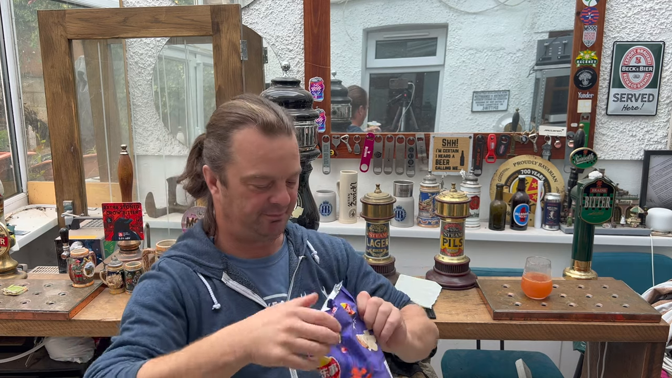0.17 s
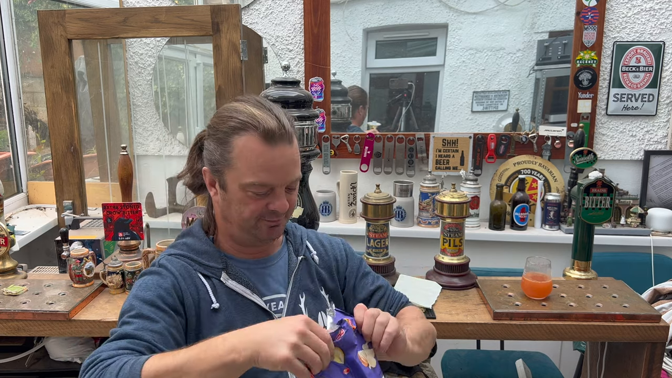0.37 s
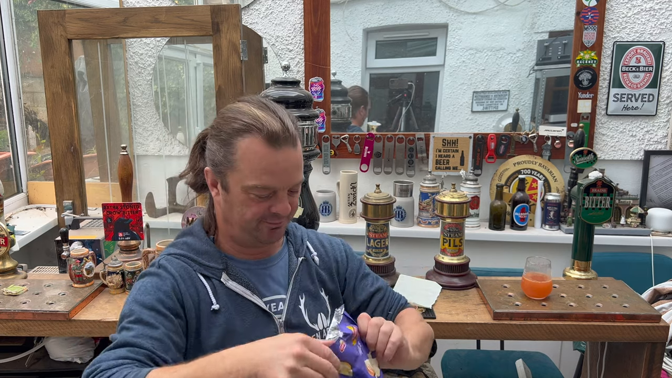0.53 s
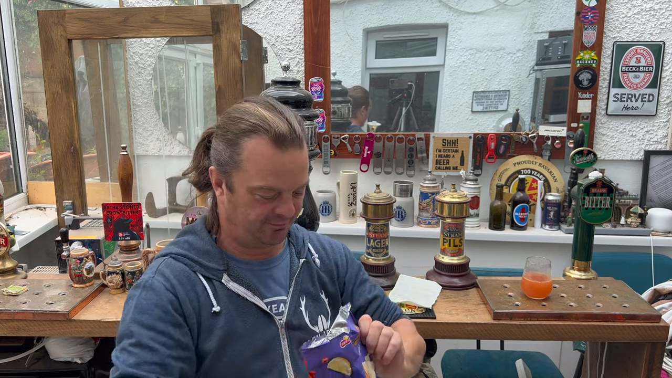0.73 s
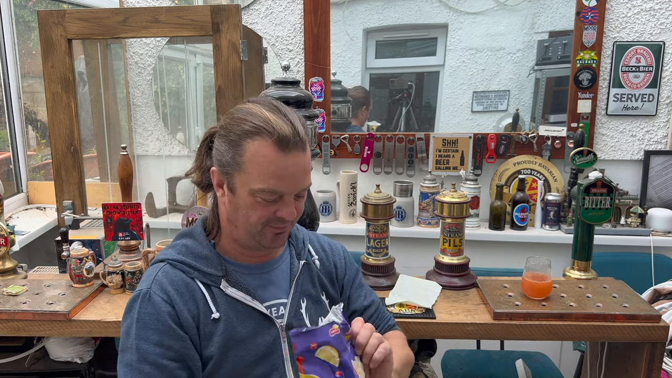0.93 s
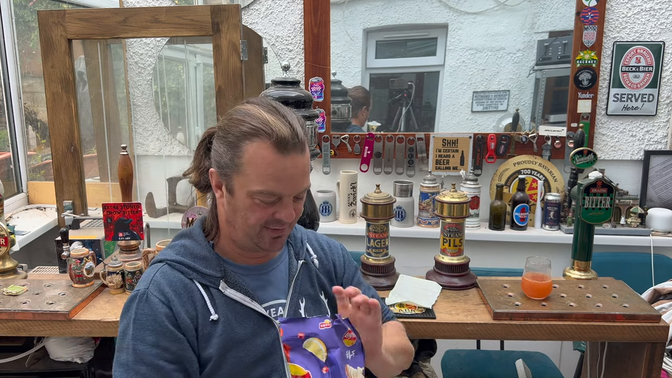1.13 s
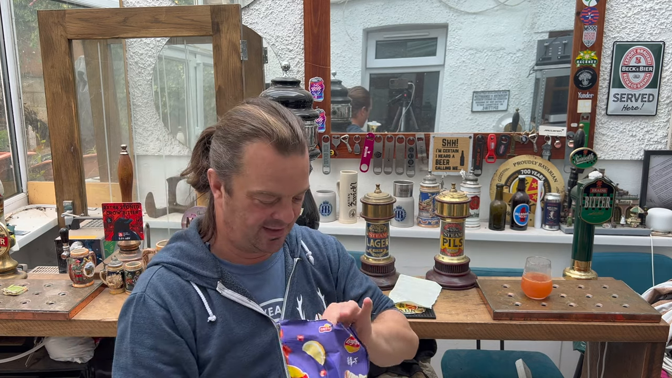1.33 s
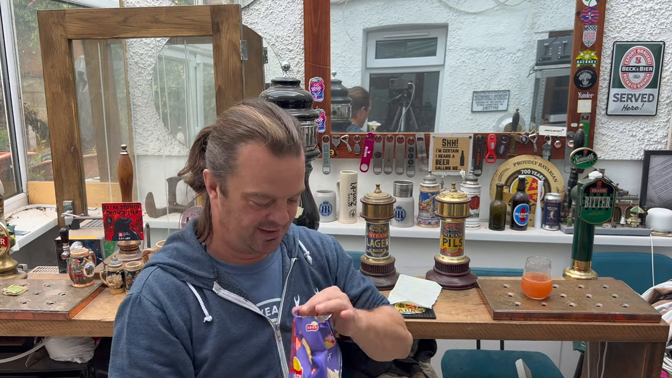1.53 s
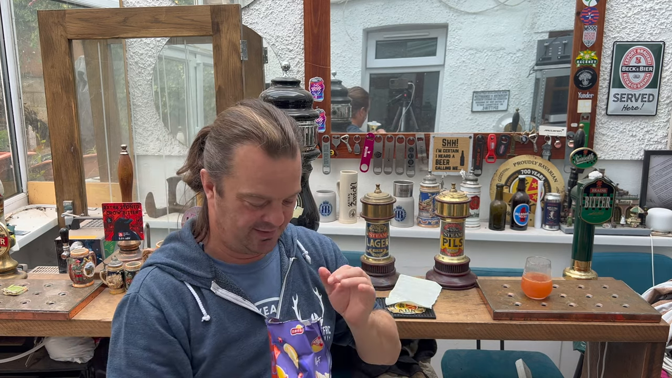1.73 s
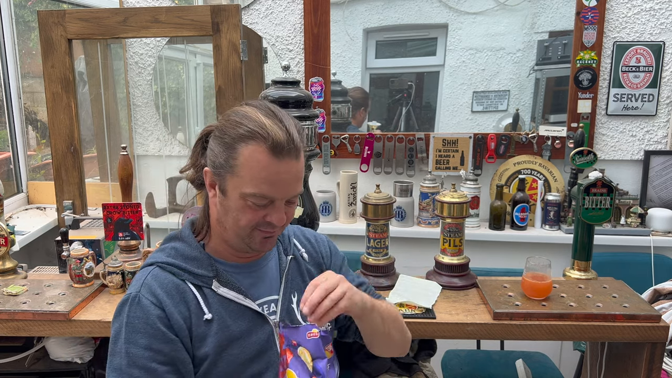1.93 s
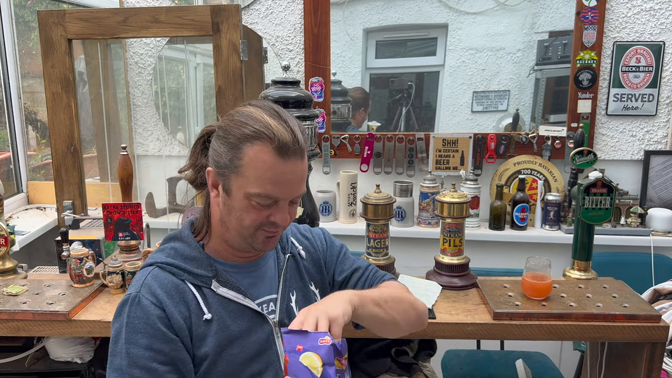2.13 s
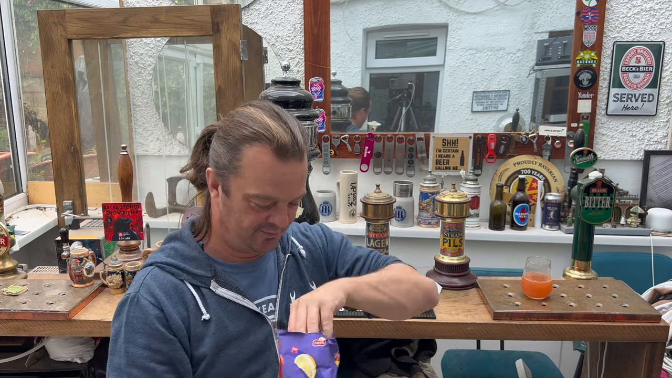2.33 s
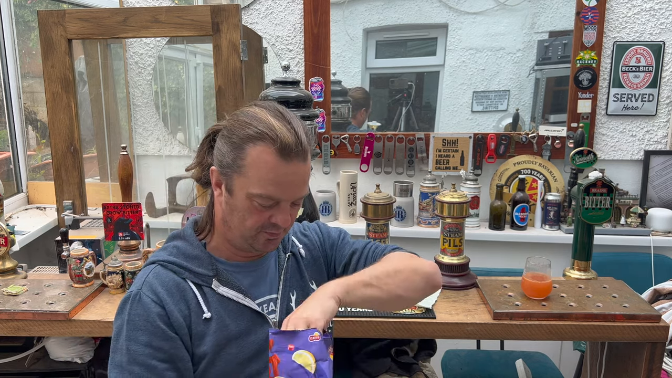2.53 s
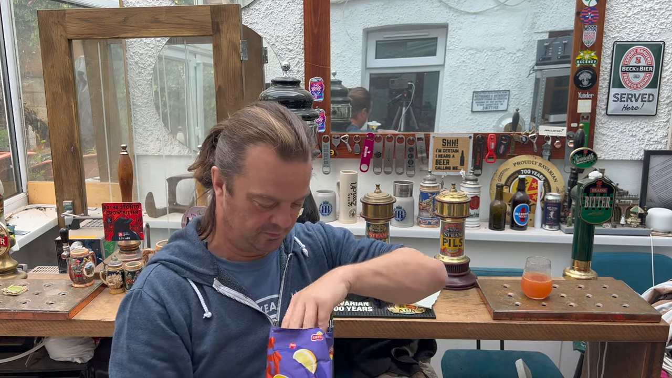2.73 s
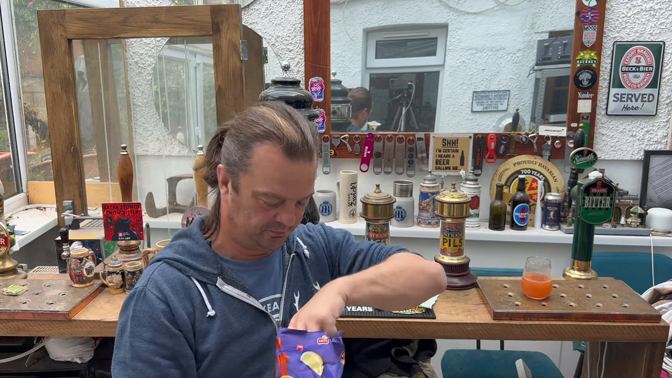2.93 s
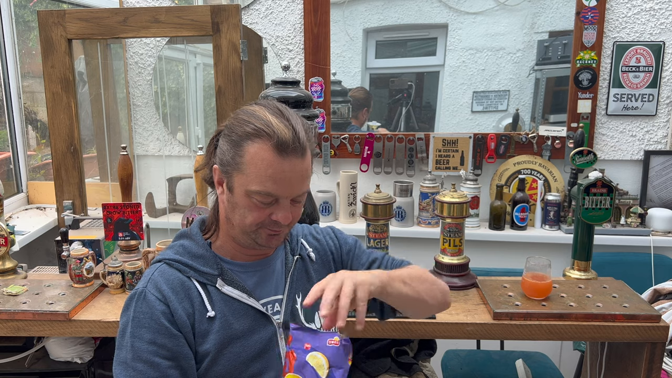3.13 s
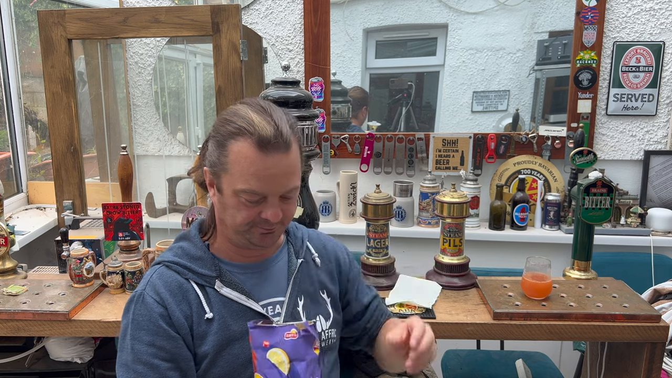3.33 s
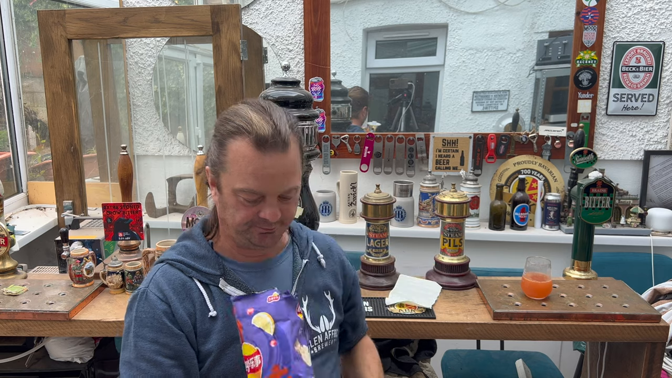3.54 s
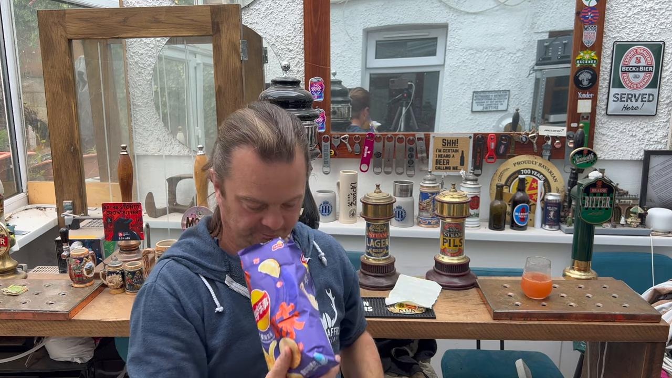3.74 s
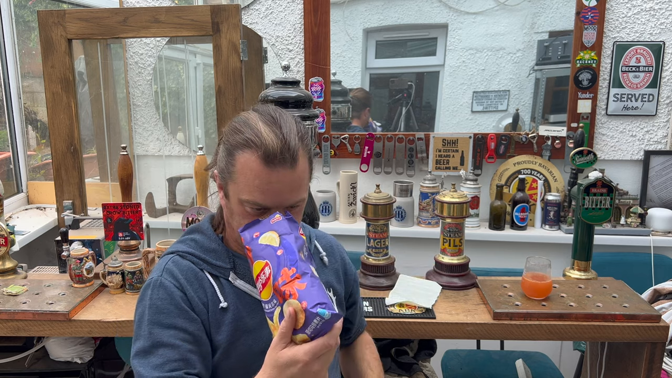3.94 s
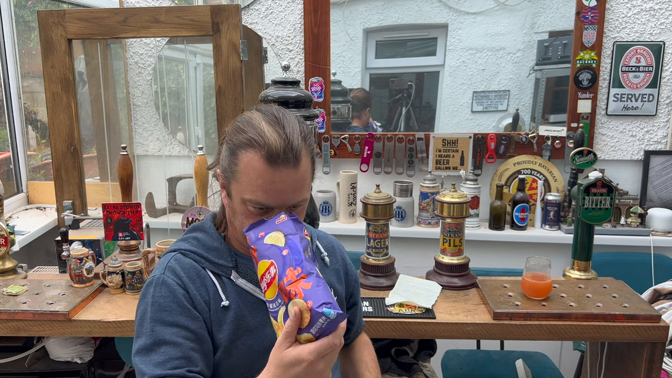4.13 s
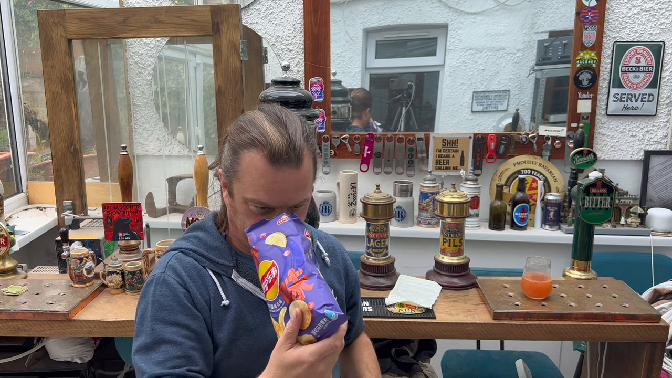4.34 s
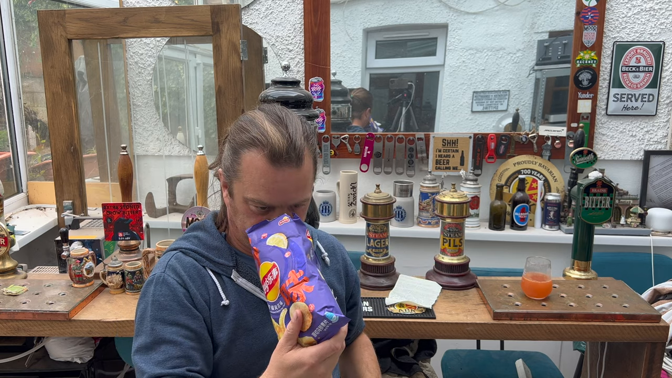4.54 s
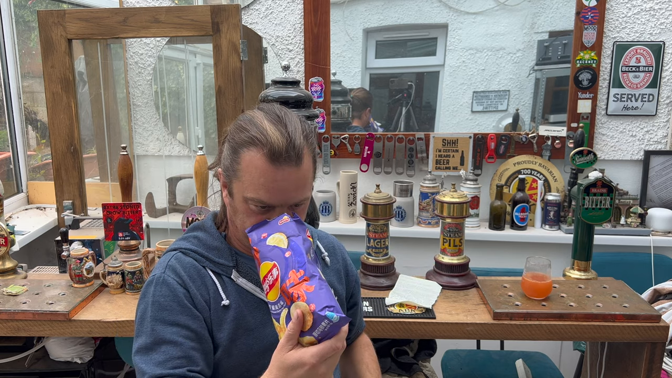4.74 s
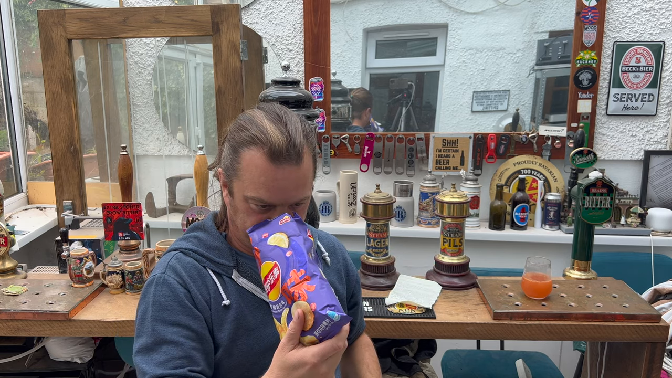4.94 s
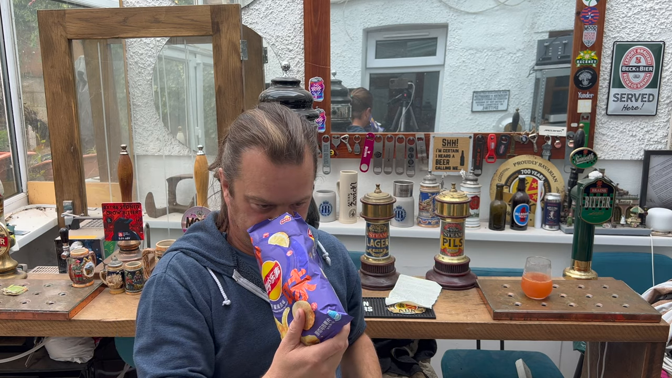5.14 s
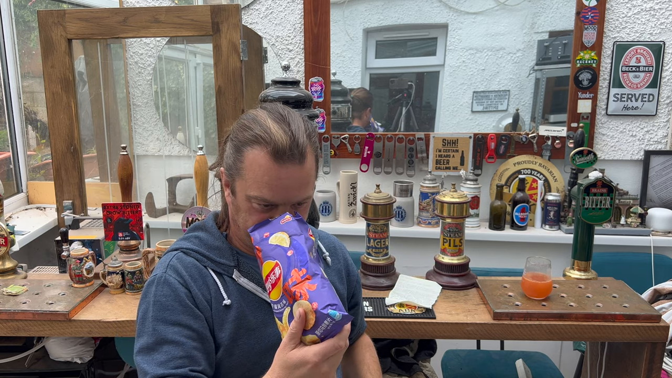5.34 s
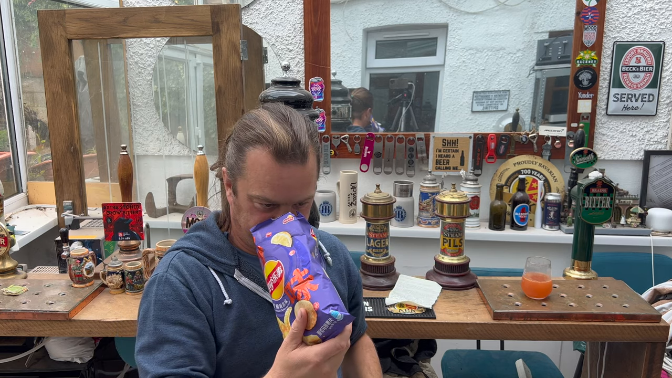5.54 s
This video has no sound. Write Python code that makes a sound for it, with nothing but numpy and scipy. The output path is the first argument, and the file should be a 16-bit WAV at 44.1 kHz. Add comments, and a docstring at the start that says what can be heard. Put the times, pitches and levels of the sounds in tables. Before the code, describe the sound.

Close stereo recording in a small, hard-walled room: a foil snack bag is opened and rummaged in. Bright snaps, hollow panel pops and fine crinkles come in irregular bursts, loudest near 1.4 and 2.1 seconds, with short live reflections. Handling thins after 3.3 seconds, leaving low air noise and wavering appliance hum, then a few faint dull bumps and ticks after 5 seconds.

```python
"""A small hard-walled room: a foil snack bag is pulled open and rummaged in.
Creases snap with a bright crack while the panels around them pop, each snap an avalanche of tiny buckles;
panels also swing with a short pitched "wip". Between the snaps, gripping fingers crinkle the small folds
and push the air in the bag, and the hand bumps its soft side. Dense reflections and narrow resonances
ring on behind, over low air noise and the wavering hum of an appliance."""
import sys
import numpy as np
from scipy import signal
from scipy.fft import rfft, irfft
from scipy.io import wavfile
from scipy.ndimage import uniform_filter1d

SR = 44100
rng = np.random.default_rng(int(sys.argv[2]) if len(sys.argv) > 2 else 0)


def wrap_up_sound(samples):
    """Save the sound to the file named by the first command line argument, as 16-bit audio."""
    columns = np.atleast_2d(samples).T
    # keep every value between -1 and 1, then stretch to whole-number steps
    tamed = np.clip(columns, -1, 1)
    steps = np.round(tamed * 32767).astype(np.int16)
    wavfile.write(sys.argv[1], SR, steps)


N = 250488

PANEL_HZ, PANEL_SPREAD = 1155, 0.3  # usual pitch of a flexing panel; how pitches differ (natural log)
# half widths of the resonances: foil rings for a few milliseconds only
PANEL_WIDTH_HZ, CREASE_WIDTH_HZ = 140, 220


def amp(db):
    """Decibels to gain."""
    return 10 ** (np.asarray(db) / 20)


def unit(x):
    """Scales to energy 1."""
    return x / np.sqrt(np.sum(x ** 2, axis=-1, keepdims=True) + 1e-20)


def read(points, hz):
    """A table's value at hz, on a log-frequency axis."""
    f, value = np.transpose(points)
    return np.interp(np.log(hz + 1), np.log(f + 1), value)


def envelope(points):
    """A (t/s, value) table drawn as straight lines over the whole scene."""
    return np.interp(np.arange(N) / SR, *np.transpose(points))


def add(mix, s, sound):
    """Mixes a sound in at time s."""
    at = round(s * SR)
    sound = sound[max(-at, 0):]
    part = mix[max(at, 0):][:len(sound)]
    part += sound[:len(part)]


def drift(count):
    """Smooth chance of rms 1 that changes over about count samples."""
    slow = rng.standard_normal(N)
    for _ in range(2):
        slow = uniform_filter1d(slow, count, mode="wrap")
    return slow / slow.std()


def steady(x, size):
    """Holds a random texture near rms 1 over stretches of size samples."""
    return x / np.sqrt(abs(uniform_filter1d(x ** 2, size)) + 1e-9)


def click(spectrum, stretch=1, tilt_db=0, ring=(1000, 100, 0), size=1024):
    """The shortest causal (minimum-phase) click with a given spectrum.

    stretch moves it up in frequency, tilt_db (per octave) brightens the treble,
    ring is a resonance (f/Hz, half width/Hz, level/dB)."""
    hz = abs(np.fft.fftfreq(size, 1 / SR))
    octaves = np.log2(np.maximum(hz, 2500))  # the tilt starts at 2500 Hz
    tilt = tilt_db * (octaves - octaves[0])
    ring_hz, width_hz, ring_db = ring
    peak = (amp(ring_db) ** 2 - 1) / (1 + ((hz - ring_hz) / width_hz) ** 2)
    gain = np.sqrt(1 + peak) * amp(read(spectrum, hz / stretch) + tilt)
    minimum_phase = np.exp(np.conj(signal.hilbert(np.log(gain))))
    return unit(np.fft.ifft(minimum_phase).real[:size // 2])


# How alike diffuse sound is at the microphone's two ports: (f/Hz, coherence)
LIKENESS = [(60, 0.99), (130, 0.79), (250, 0.87), (500, 0.061), (1000, 0), (2000, 0), (4000, 0)]


def pair(z, hz):
    """Makes two unrelated spectra as alike as diffuse sound is at the two ports."""
    same = read(LIKENESS, hz)
    return np.array([z[0], same * z[0] + np.sqrt(1 - same ** 2) * z[1]])


# Colour of the air noise: (f/Hz, relative level/dB per Hz)
FLOOR = [(25, -13), (45, -11.5), (70, -7.5), (110, -5.5), (135, -6), (200, -8.5), (330, -11), (400, -8),
         (520, -13.5), (650, -22.5), (800, -19), (1100, -19.5), (1350, -22.5), (1600, -22), (2000, -30.5),
         (2800, -40), (5500, -44), (7300, -38.5), (10000, -57.5), (16000, -76)]
FLOOR_DB = -58


def air_noise():
    """Low air noise: random sound from everywhere, shaped in frequency."""
    hz = np.fft.rfftfreq(N, 1 / SR)
    spectra = pair(rfft(rng.standard_normal((2, N))), hz)
    air = irfft(spectra * amp(read(FLOOR, hz)), N)
    return amp(FLOOR_DB) * np.sqrt(N) * unit(air)


# Lines of the appliance hum: (centre f/Hz, rms level/dB before its waver)
HUM = [(69, -79.5), (105.7, -62.5), (185, -70), (212, -70.5), (258, -77), (371.5, -68)]


def appliance_hum(waver_hz=4.0, waver_db=3.0):
    """Low sine lines whose pitch and level each waver smoothly."""
    hum = np.zeros(N)
    for line_hz, db in HUM:
        turns = np.cumsum(line_hz + waver_hz * drift(count=3000)) / SR
        level = amp(db + waver_db * drift(count=3000))
        hum += np.sqrt(2) * level * np.sin(2 * np.pi * turns)
    return hum


def facet(spectrum, spread, patchy_db, ring):
    """The click of one small patch of foil: its size shifts the spectrum, its shape favours some bands."""
    hz = np.geomspace(200, 16000, 24)
    favour_db = patchy_db * rng.standard_normal(len(hz))
    own = np.column_stack([hz, read(spectrum, hz) + favour_db])
    return click(own, np.exp(spread * rng.standard_normal()), ring=ring)


# Colour of a snapping crease: (f/Hz, relative level/dB per Hz)
CREASE = [(300, -19.5), (900, -11.5), (1900, -4), (2700, -1), (3600, -3), (5200, 2), (6800, 1),
          (8700, -1.5), (11500, -16.5), (15500, -21)]


def crease(ring_db=9):
    """A sharp fold flips over and rings briefly at a pitch of its own."""
    hz = 4500 * 2 ** rng.uniform(-1.1, .8)
    return facet(CREASE, spread=.04, patchy_db=3.5, ring=(hz, CREASE_WIDTH_HZ, ring_db))


# Colour of a buckling panel: (f/Hz, relative level/dB per Hz)
PANEL = [(200, -18.5), (480, -9), (780, -1.5), (1080, 3), (1320, -4), (1800, 0.5), (2400, -10), (5000, -27),
         (16000, -54)]


def panel(ring_db=12):
    """A wide face of the bag buckles and swings for a few cycles at its own pitch."""
    hz = PANEL_HZ * np.exp(PANEL_SPREAD * rng.standard_normal())
    return facet(PANEL, spread=.15, patchy_db=4.5, ring=(hz, PANEL_WIDTH_HZ, ring_db))


def folds(make_facet, per_s, count=24):
    """A clumped stream of small buckles of all sizes; the stress hops from one patch of foil to the next."""
    size = amp(3.5 * np.minimum(rng.exponential(1, N), 4) + 5 * drift(count=70))
    hits = size * rng.choice([-1, 1], N) * (rng.random(N) < per_s / SR)
    hops = np.cumsum(rng.random(N) < 300 / SR)  # 300 hops a second on average
    patch = rng.integers(0, count, N)[hops]
    stream = sum(signal.oaconvolve(hits * (patch == k), make_facet())[:N] for k in range(count))
    return steady(stream, size=1100)


# Colour of the air pushed by the bag: (f/Hz, relative level/dB per Hz)
AIR = [(25, -32), (45, -11.5), (65, 5), (90, 4), (160, 5), (280, -6.5), (400, -9.5), (600, -20),
       (1500, -40.5)]


def pushed_air():
    """The bag pushes air: a low rumble of noise at an even level."""
    rumble = signal.oaconvolve(rng.standard_normal(N), click(AIR, size=8192))[:N]
    return steady(rumble, size=1500)


# Short grips of the fingers: (start t/s, length t/s, force: relative level/dB,
# crispness: level/dB more for the fine folds and less for the panels, pushed air: level/dB)
GRIPS = [(-0.01, 0.093, -46, -0.5, -52), (0.163, 0.11, -48, 0, -52.5), (0.296, 0.051, -47.5, 6, -51.5),
         (0.376, 0.039, -34.5, 2, -42), (0.857, 0.11, -44.5, 3.5, -49.5), (0.999, 0.14, -46.5, -3, -60.5),
         (1.253, 0.11, -49.5, 1.5, -57), (1.359, 0.067, -29.5, 1.5, -40), (1.499, 0.072, -45.5, 1.5, -49.5),
         (1.74, 0.81, -66.5, -3, -70), (2.007, 0.08, -46, -4, -50.5), (2.08, 0.079, -30.5, -1.5, -39),
         (2.16, 0.092, -39.5, -0.5, -47.5), (2.471, 0.18, -40.5, -1, -47), (2.848, 0.12, -56.5, -1, -59),
         (2.877, 0.025, -36.5, 0, -48), (2.917, 0.24, -47, -2.5, -50.5), (3.215, 0.16, -56, -1.5, -60),
         (3.75, 0.11, -75.5, -2, -72.5)]
GRIP_ATTACK_S, GRIP_RELEASE_S, RELAX_DB_PER_S = 0.0065, 0.0063, 23
AIR_ATTACK_S = 0.0062  # rise of the pushed air


def grips():
    """Each grip takes hold, relaxes and lets go. Gives the drive of (fine folds, panels, pushed air)."""
    out = np.zeros((3, N))
    t = np.arange(SR) / SR
    for s, length_s, force_db, crisp_db, air_db in GRIPS:
        hold = amp(-RELAX_DB_PER_S * t) * np.exp(-np.maximum(t - length_s, 0) / GRIP_RELEASE_S)
        foil = hold * np.minimum(t / GRIP_ATTACK_S, 1)
        air = hold * np.minimum(t / AIR_ATTACK_S, 1)
        add(out[0], s, amp(force_db + crisp_db) * foil)
        add(out[1], s, amp(force_db - crisp_db) * foil)
        add(out[2], s, amp(air_db) * air)
    return out


# Taut foil sparkles more than slack foil: (t/s, treble level/dB of the fine folds)
TAUTNESS = [(0, -15), (.3, 12), (.9, 7), (1.4, 5), (2.1, 6.5), (2.6, 0), (3.0, 3), (3.3, -22), (5.3, -7)]


def crinkle(flex_db=-6.0, top_hz=8500, flex_aim=0.91, detour=13):
    """The fingers keep small folds snapping and panels flexing, and the bag pushes air.

    Gives (left, right, into the room)."""
    fine, flex, air = grips()
    creases = fine * folds(crease, per_s=2200)
    panels = amp(flex_db) * flex * folds(panel, per_s=450)
    treble = signal.butter(2, top_hz, "high", fs=SR, output="sos")
    top = signal.sosfiltfilt(treble, creases)
    body = creases - top + air * pushed_air()
    sparkle = top * amp(envelope(TAUTNESS))
    direct = body + flex_aim * panels
    # the shortest waves reach the left port by a detour (in samples)
    late_sparkle = np.pad(sparkle, (detour, 0))[:N]
    return np.array([direct + late_sparkle, direct + sparkle, body + panels + sparkle])


# The clearest snaps of the foil: (t/s, crease crack level/dB, panel pop level/dB,
# aim: extra direct level/dB towards the microphone, fall time of the avalanche t/s,
# panel pitch f/Hz, crease pitch f/Hz, how far the crease's pitch stands out
# (or, below 0, is cancelled) level/dB, brightness of the crack dB per octave)
SNAPS = [(0.004, -28.5, -36, -1.5, 0.0055, 1830, 5600, 7, 2),
         (0.035, -33, -30, 1.5, 0.002, 1800, 6330.0, 7, -1),
         (0.046, -31, -32.5, 1.5, 0.0032, 1150, 6370.0, 8, -1),
         (0.103, -28.5, -36.5, 1.5, 0.003, 1740.0, 5600, 14, 1),
         (0.164, -30, -24.5, -2, 0.0034, 1060, 5570, 1, -4),
         (0.22, -29.5, -30, 0, 0.0043, 1180, 4800.0, 1, -5),
         (0.233, -26, -44.5, 2.5, 0.0021, 1850.0, 4790.0, 8, -6),
         (0.27, -39, -35, 5.5, 0.0037, 1080, 3640.0, 13, 3),
         (0.295, -22.5, -27, -1.5, 0.0031, 1170.0, 5650, 5, -3),
         (0.307, -27, -29, 3, 0.0016, 1180, 5720.0, 11, 0),
         (0.338, -23.5, -35, 7.5, 0.0014, 1810.0, 5700, 8.5, -2.5),
         (0.372, -15.5, -24.5, 7.5, 0.0028, 1250, 7430, 5.5, 0),
         (0.389, -27.5, -28.5, 10.5, 0.0045, 1420, 5400.0, 4, -5),
         (0.399, -25.5, -40, 8, 0.0024, 1060, 4275, 14, 4),
         (0.496, -31.5, -30, -1.5, 0.011, 1120.0, 7360.0, -7, 7),
         (0.606, -26.5, -31.5, 0, 0.0027, 645, 5160, 3, -0.5),
         (0.719, -34.5, -44, 0, 0.0014, 1570, 6440, 11, 0),
         (0.843, -28.5, -23.5, -7.5, 0.014, 1130, 6130.0, 11, -8),
         (0.878, -34, -27.5, 2.5, 0.0019, 1160.0, 7010.0, 2, 10),
         (0.897, -25, -28, 3.5, 0.0022, 1880, 7600, -5, -2.5),
         (0.946, -23.5, -26, 2, 0.0062, 1850, 2210.0, 10.5, -0.5),
         (0.969, -32, -31, -3, 0.0028, 1700.0, 3570.0, 5, 8),
         (1.008, -48, -34, 7, 0.0014, 1170, 4190.0, 6, -2),
         (1.023, -35.5, -31, 6, 0.0025, 1010, 3650.0, 12, 2.5),
         (1.039, -49, -38.5, -3, 0.0013, 1210, 2210.0, 7, -6),
         (1.082, -21, -28.5, 6, 0.0014, 1020, 6360, 7, 3),
         (1.244, -24.0, -36.5, 0.5, 0.0016, 1610, 5700, 7, -4),
         (1.285, -38.5, -35, 5.5, 0.0012, 1040, 6720.0, 15, 1),
         (1.326, -23, -22, -4, 0.0025, 1800, 3420, 1, -6),
         (1.357, -13.5, -20, -1.5, 0.0024, 1170, 6300, 6, 5),
         (1.364, -15.5, -12.5, -3, 0.0062, 1680, 2600, 14, 6),
         (1.384, -11.5, -18, -2, 0.009, 795, 6560, 10, 1),
         (1.399, -21, -21, 9, 0.0049, 1240, 6630.0, -3, -1.5),
         (1.523, -33.5, -26, 2, 0.0026, 925, 5480.0, 17, 0),
         (1.542, -37, -31.5, 3.5, 0.002, 955, 4490.0, 16, 1),
         (1.561, -51, -37, 6, 0.0015, 1120, 7490.0, 7.5, 4),
         (1.738, -35, -33.5, 3.5, 0.0012, 1000, 5800, 4, -4),
         (1.855, -66, -44.5, 4.5, 0.0029, 714, 2220, 17, -8),
         (1.986, -34.5, -41, 0, 0.005, 1190, 5800, 12, -1.5),
         (2.014, -34.5, -45, 0.5, 0.0016, 1210.0, 4930.0, 13, -1),
         (2.062, -19.5, -20.5, -1, 0.0039, 1150, 4870, 7, 8.5),
         (2.073, -20.5, -24.5, 0.5, 0.0032, 1180, 3130, 14, 0),
         (2.088, -18.5, -23.5, 5, 0.005, 1090, 6470.0, 1, 1),
         (2.118, -24, -26, 6.5, 0.003, 1140, 4850, 11, -3),
         (2.127, -14, -15.5, 2, 0.007, 1170, 5000, 11, 1),
         (2.153, -31, -24.5, 6, 0.003, 1770, 5500, 9.5, -2),
         (2.196, -25.5, -28, 7.5, 0.0027, 1160.0, 7120.0, -8, -3.5),
         (2.25, -46.0, -31.5, 7, 0.0022, 1070, 5760.0, 8, -7),
         (2.448, -38.0, -33, 1, 0.01, 1120.0, 3830, 12, -2),
         (2.47, -26, -27.5, -0.5, 0.0081, 1130, 4890.0, 7, -4.5),
         (2.482, -35, -26.5, -0.5, 0.0012, 1150.0, 4910.0, 3.5, -1),
         (2.546, -27, -27.5, -2.5, 0.003, 1240, 5880.0, 12, 3),
         (2.604, -35, -39, 5, 0.0026, 1100, 4070.0, 9, 2),
         (2.636, -30, -30.5, 0, 0.003, 1040.0, 4730, 5.5, 3),
         (2.652, -28.5, -39, -0.5, 0.0017, 1190, 4570.0, 4, 1),
         (2.691, -41, -33.5, -0.5, 0.0015, 1150, 5680.0, 8, -10),
         (2.813, -46.5, -40, 5, 0.0017, 990, 2390.0, 15.5, -9),
         (2.876, -22, -22.5, -0.5, 0.0054, 1190, 3970, 6, -3.5),
         (2.885, -33, -25.5, 1, 0.0012, 990, 5000, 4.5, -2.5),
         (2.897, -35, -32.5, 8, 0.003, 1110, 5860.0, 10, -5),
         (2.962, -20, -24, 3.5, 0.004, 1150, 5900, 8.5, 0),
         (3.032, -32.5, -31, -3, 0.0018, 1160, 5820.0, 6, 4),
         (3.045, -31.5, -52, -0.5, 0.0022, 1210.0, 6100.0, 5, 2),
         (3.072, -26, -31.5, 2.5, 0.0024, 1020, 5030, 10.5, -6),
         (3.14, -45, -36.5, 3, 0.0018, 1020, 5080.0, 1.6667, -1),
         (3.226, -45, -34.5, -4, 0.002, 1020.0, 7280.0, 5.5, -8),
         (3.253, -39.5, -35, 6, 0.0059, 790, 3120, 4.5, -12),
         (3.313, -49, -43.5, 7.5, 0.002, 1010, 3900.0, 6, -10),
         (3.36, -48.5, -51, 7, 0.0026, 1210, 2920.0, 5.5, -12),
         (3.472, -36, -39.5, -2, 0.0014, 1060, 3400, 9.5, -6),
         (3.649, -62.5, -42, -3, 0.002, 1395, 2490.0, 9.5, -6),
         (3.695, -63.5, -64.0, 3.5, 0.001, 780.0, 8500, 6.5, 6.5),
         (3.742, -55.5, -58.5, 0, 0.0052, 1079, 2590.0, 9.5, -1.5),
         (5.028, -55, -49, -2.5, 0.0024, 730.0, 3590, 11.5, -9),
         (5.342, -52, -57, -3, 0.0015, 1200, 5500, 3, -5),
         (5.349, -43, -45, -5.5, 0.0026, 850, 3620, 9.5, -7.5)]
PANEL_RING_DB, BUCKLES_PER_S = 9, 6000  # how far a panel's pitch stands out; density of an avalanche


def snaps(rise_share=0.83, lead=0.22, own_share=0.94, settle_share=0.61, settle_s=0.019):
    """Each snap is an avalanche of tiny buckles around one main one. Gives (left, right, into the room)."""
    out = np.zeros((3, N))
    t = np.arange(-350, 1100) / SR
    usual_pop = click(PANEL, ring=(PANEL_HZ, PANEL_WIDTH_HZ, PANEL_RING_DB / 2))
    for s, crack_db, pop_db, aim_db, length_s, panel_hz, crease_hz, ring_db, tilt_db in SNAPS:
        swell = np.exp(np.where(t < 0, t / rise_share, -t) / length_s)
        # a few stray buckles follow while the foil settles
        strays = (t > 0) * (rng.random(len(t)) < 700 / SR) * np.exp(-t / settle_s)
        chance = rng.standard_normal((4, len(t)))
        flips = rng.random(len(t)) < BUCKLES_PER_S / SR
        buckles = unit(chance * flips * swell) + settle_share * unit(chance * strays)
        main = lead * (t == 0)
        # short waves reach the two ports differently, long ones alike
        cracks = buckles[0] + own_share * buckles[1:3] + main
        pops = buckles[[3, 3]] + main
        crack = click(CREASE, tilt_db=tilt_db, ring=(crease_hz, CREASE_WIDTH_HZ, ring_db))
        pop = click(PANEL, ring=(panel_hz, PANEL_WIDTH_HZ, PANEL_RING_DB))
        usual_crack = click(CREASE, tilt_db=tilt_db)
        layers = [(cracks, crack, usual_crack, crack_db), (pops, pop, usual_pop, pop_db)]
        for drive, body, usual, db in layers:
            for ear, sound in zip(out, unit(signal.fftconvolve(drive, body[None], axes=1))):
                add(ear, s + t[0], amp(db + aim_db) * sound)
            # over all directions the buckles' interference evens out: the room gets one click, less coloured
            add(out[2], s, amp(db) * unit(body + usual))
    return out * np.sqrt(SR / 1000)  # levels count as rms over 1 ms


# Colour of a bump of the hand: (f/Hz, relative level/dB per Hz)
BUMP = [(60, -26.5), (140, 2.5), (250, 6), (420, -6), (700, -14), (2000, -43)]
# Dull bumps of the hand on the bag: (t/s, level/dB, its energy counted as rms over 1 ms)
BUMPS = [(0.026, -57), (0.162, -36), (2.013, -38), (3.075, -47), (3.25, -49), (3.665, -46), (5.028, -43),
         (5.052, -40.5), (5.074, -43), (5.348, -39)]


def bumps():
    """The hand meets the bag's soft side: a short low push."""
    out = np.zeros(N)
    for s, db in BUMPS:
        add(out, s, amp(db) * click(BUMP, size=2048))
    return out * np.sqrt(SR / 1000)


# Pitched swings of the panels, a short "wip", alone or together with a snap:
# (t/s, level/dB, pitch f/Hz, swell t/s)
FLEXES = [(0.296, -41, 1162, 0.0028), (0.333, -33.5, 1784, 0.0022), (0.408, -35.5, 1002, 0.0017),
          (0.619, -44.5, 1113, 0.0027), (0.869, -32.5, 1130, 0.0023), (0.879, -32, 1161, .0025),
          (0.94, -41, 1134, 0.0055), (1.007, -39, 1767, 0.0016), (1.298, -44, 1082, 0.002),
          (1.362, -24.5, 2650, 0.0026), (1.392, -28.5, 843, .002), (1.512, -47, 1013, 0.0026),
          (1.552, -46, 1112, 0.0027), (2.017, -46, 1200, 0.0028), (2.237, -39, 1130, 0.0022),
          (2.251, -31.5, 1098, 0.0028), (2.47, -32, 1124, 0.0029), (2.526, -43, 1190, 0.0036),
          (2.557, -40, 1093, 0.0023), (2.564, -35, 897, 0.0027), (2.607, -37.5, 1055, .002),
          (2.617, -37, 1122, 0.002), (2.654, -44, 1758, 0.0015), (2.875, -31.5, 1142, .003),
          (3.029, -42.5, 936, 0.0013), (3.108, -40.5, 1130, .003), (3.12, -39.5, 1085, 0.0019),
          (3.649, -54, 1822, 0.0013), (3.665, -51, 751, 0.0028), (5.363, -55, 1204, .002)]


def flexes(sag=0.027, release=1.388, overtone_db=-17, overtone=1.62, room_db=-6):
    """A panel swings for a few cycles, swelling and fading while its pitch sags.

    Gives (left, right, into the room)."""
    out = np.zeros(N)
    t = np.arange(-700, 1000) / SR
    for s, db, hz, swell_s in FLEXES:
        age = t / swell_s
        swell = np.exp(-.5 * np.where(age < 0, age, age / release) ** 2)
        turns = np.cumsum(hz * (1 - sag * np.tanh(age))) / SR + rng.random()
        swing = np.sin(2 * np.pi * turns) + amp(overtone_db) * np.sin(2 * np.pi * overtone * turns)
        add(out, s + t[0], np.sqrt(2) * amp(db) * swell * swing)
    return np.array([out, out, amp(room_db) * out])


# Decay of the room's reflections: (f/Hz, 60 dB decay t/s)
ROOM_T60 = [(80, 0.76), (250, 0.32), (700, 0.31), (1700, 0.36), (4500, 0.38), (8000, 0.37), (15000, 0.054)]
# Strength of the room's reflections: (f/Hz, level/dB)
ROOM_LEVEL = [(100, -10), (400, 8), (1000, -1), (2000, 4.5), (3200, 2.5), (8000, -3), (15000, -6.5)]


def reflections(build_cycles=0.72, count=8):
    """Dense reflections, one in count samples, that die band by band; the bass builds up slowly."""
    taps = rng.choice([-1., 1.], (2, SR)) * (rng.random((2, SR)) < 1 / count)
    hz, t, z = signal.stft(taps, SR, nperseg=512)
    hz = hz[:, None]
    decay = amp(-60 * t / read(ROOM_T60, hz))
    build = 1 - np.exp(-t * (hz + 40) / build_cycles)
    bands = pair(z, hz) * unit(decay * build) * amp(read(ROOM_LEVEL, hz))
    tail = signal.istft(bands, SR, nperseg=512)[1][:, :SR]
    return tail * np.sqrt(count / (t[1] * SR))


# Narrow resonances of the room and the things in it: (f/Hz, relative level/dB, 60 dB decay t/s)
RINGS = [(67, -19, .6), (817, -5, .45), (938, -15, .45), (1003, -17, .45), (1137, -8, .4), (1534, -15, .45),
         (1675, -16, .45), (1809, -11, .45), (1840, -14, .45), (1892, -11, .45), (2631, -13, .45),
         (2870, -17, .45), (6640, -12, .4)]


def resonances(rings_db=-18.0):
    """Fixed modes ring as decaying sines, with a different phase at each port."""
    t = np.arange(SR) / SR
    rings = np.zeros((2, SR))
    for hz, db, t60 in RINGS:
        phase = rng.random() + rng.random((2, 1)) / 3
        ringing = np.sin(2 * np.pi * (hz * t + phase)) * amp(-60 * t / t60)
        rings += amp(db + rings_db) * unit(ringing)
    return rings


# How well the bag, as it is moved about, drives the resonances: (t/s, level/dB)
RING_DRIVE = [(0.4, -4), (0.9, -3.5), (1.4, 3.5), (2.101, 1), (2.55, -2), (3.0, -4.5)]


def room(x, gap_s=.003):
    """The reflections change as the foil's faces turn; a few resonances stay put and stand out."""
    # three reflection patterns trade places, their total power held even
    facing = unit(np.transpose([drift(count=4000) for _ in range(3)])).T
    paths = [(x * amp(envelope(RING_DRIVE)), resonances())]
    paths += [(x * share, reflections()) for share in facing]
    wet = sum(signal.fftconvolve(sound[None], tail, axes=1) for sound, tail in paths)
    return np.pad(wet, ((0, 0), (round(gap_s * SR), 0)))[:, :N]


def scene(left_db=-0.28):
    """The bag is a little to the left: its direct sound reaches that port first, by two samples."""
    left, right, spread = snaps() + flexes() + crinkle() + bumps()
    late_right = np.pad(right, (2, 0))[:N]
    near = np.array([left * amp(left_db), late_right * amp(-left_db)])
    return near + room(spread) + air_noise() + appliance_hum()


# Colour of the microphone's two ports: (f/Hz, left minus right level/dB)
PORTS = [(60, 3), (330, 5), (600, 1), (1200, 5), (2000, 2.5), (2900, 3.5), (4200, 7.5), (5500, 13.5),
         (7000, 12), (9800, 0.5), (15000, 0)]
EDGE_HZ = 16300  # upper band limit


def record(dry, low_cut_hz=42):
    """The two ports differ in colour and lose the deepest bass; then the band limit."""
    hz = np.fft.rfftfreq(N, 1 / SR)
    ratio = amp(read(PORTS, hz))
    # the two gains keep the summed power even
    gains = np.array([ratio, np.ones_like(ratio)]) * np.sqrt(2 / (1 + ratio ** 2))
    heard = irfft(rfft(dry) * gains, N)
    low_cut = signal.butter(3, low_cut_hz, "high", fs=SR, output="sos")
    heard = signal.sosfilt(low_cut, heard)
    edge = signal.firwin(255, EDGE_HZ, window=("kaiser", 9), fs=SR)
    return signal.oaconvolve(heard, edge[None], "same")


dry = scene()
out = record(dry)
wrap_up_sound(out)
```